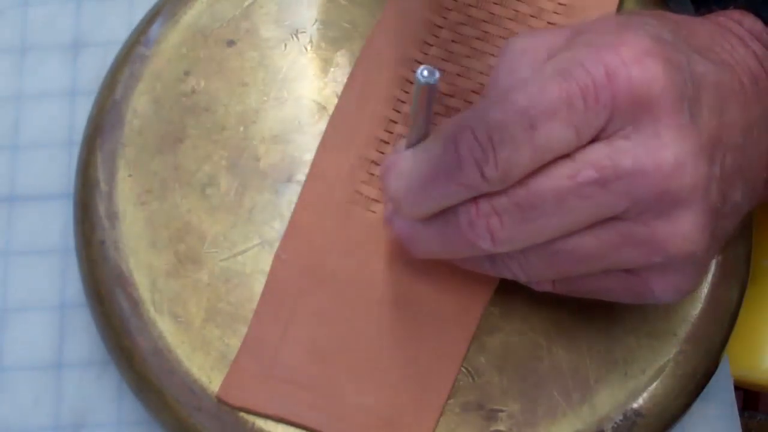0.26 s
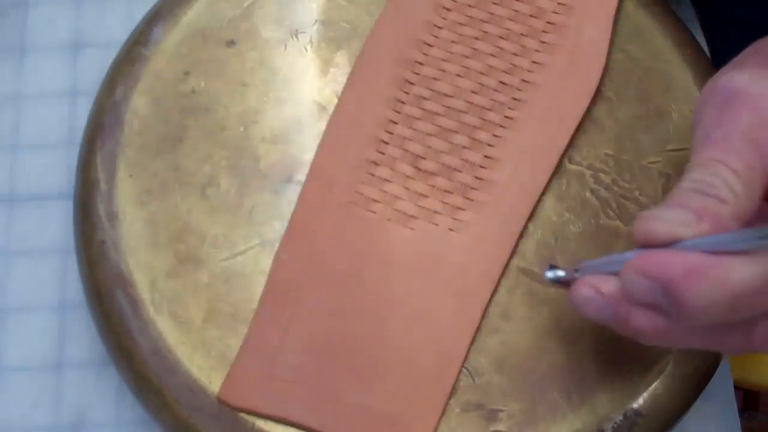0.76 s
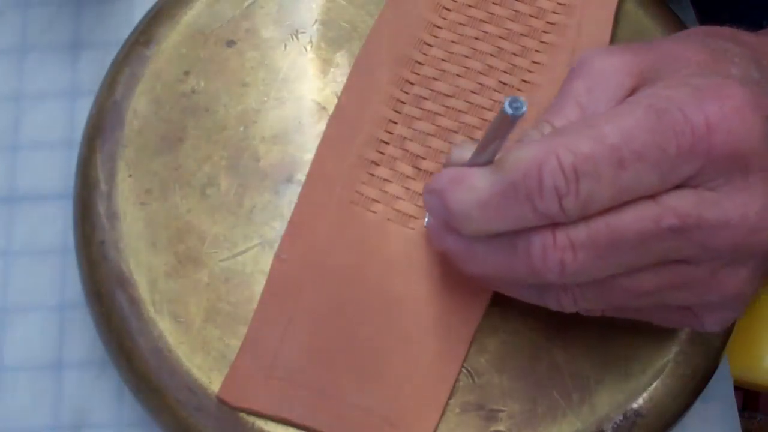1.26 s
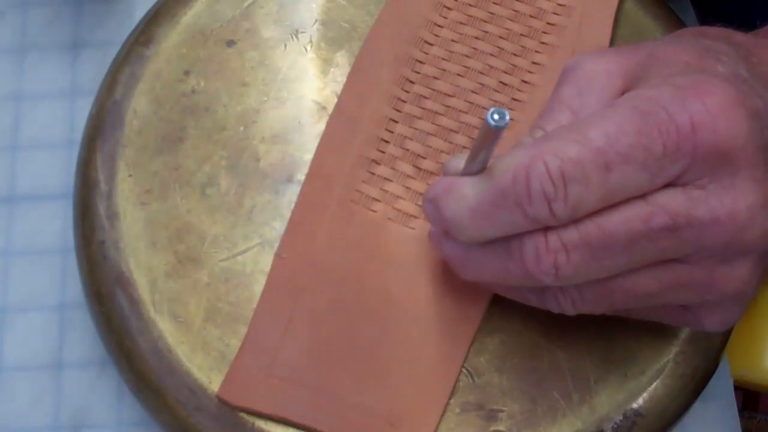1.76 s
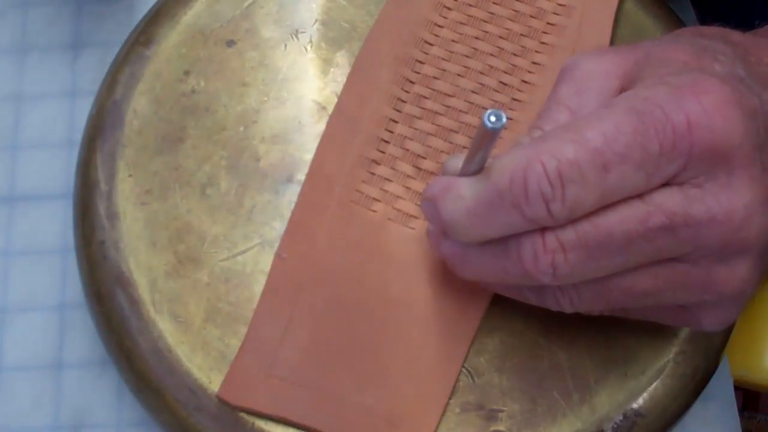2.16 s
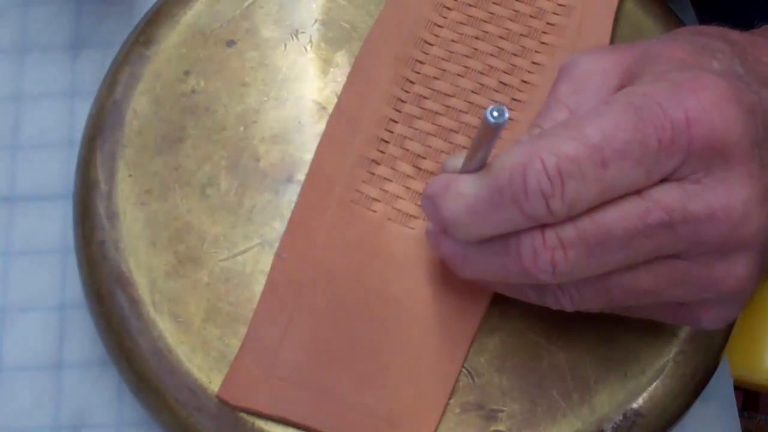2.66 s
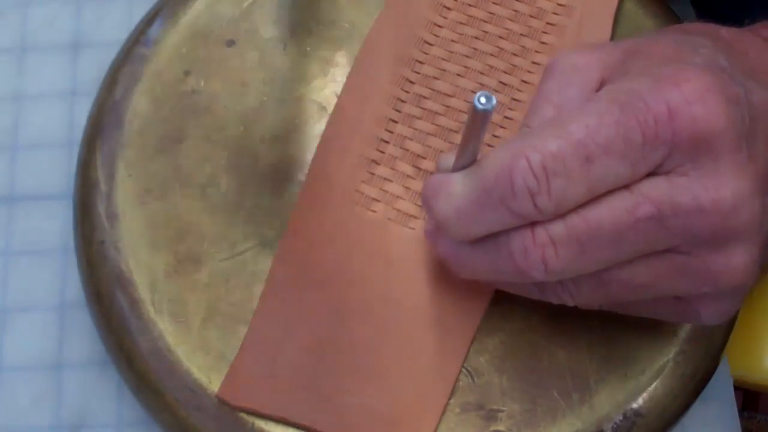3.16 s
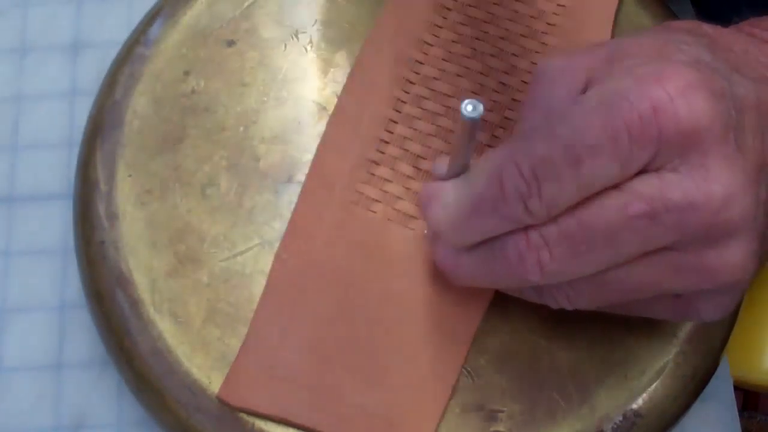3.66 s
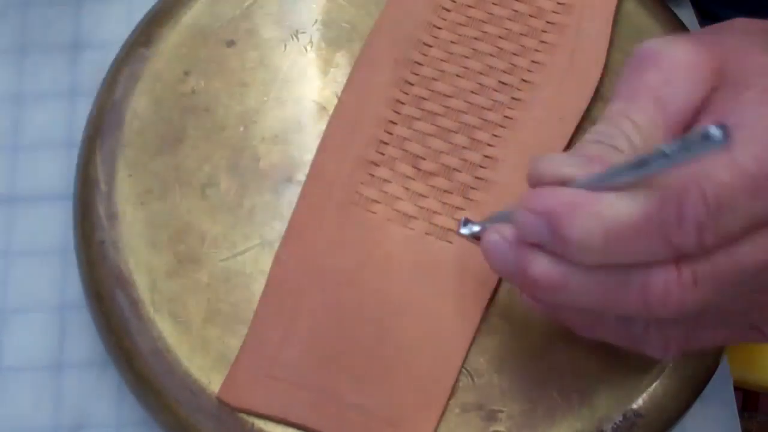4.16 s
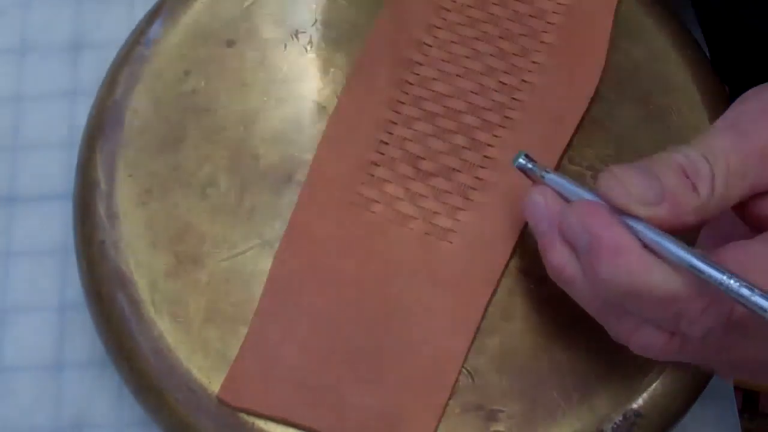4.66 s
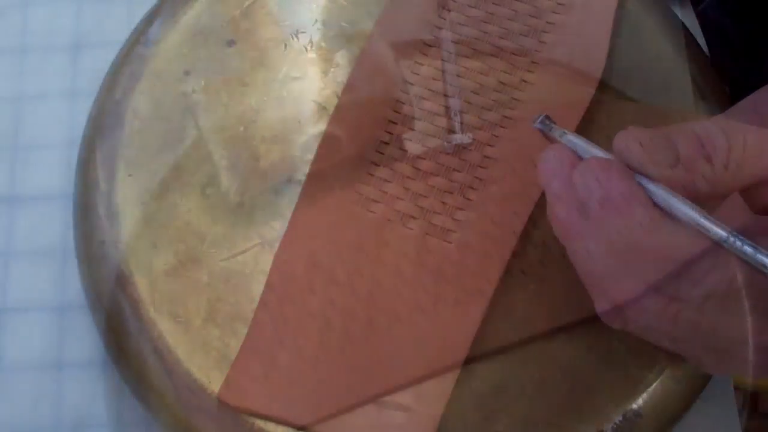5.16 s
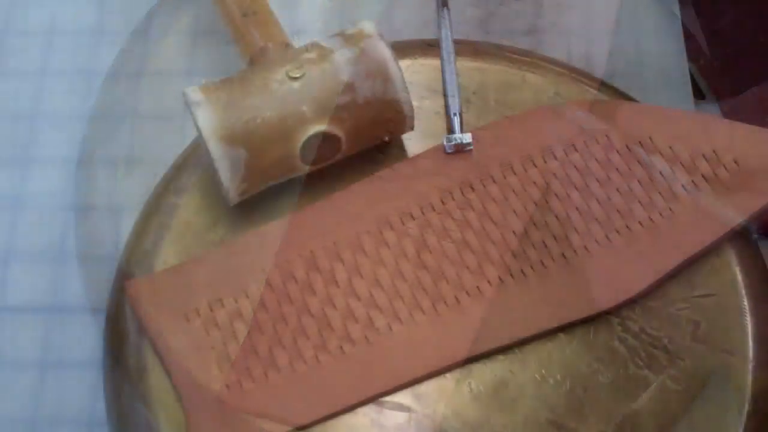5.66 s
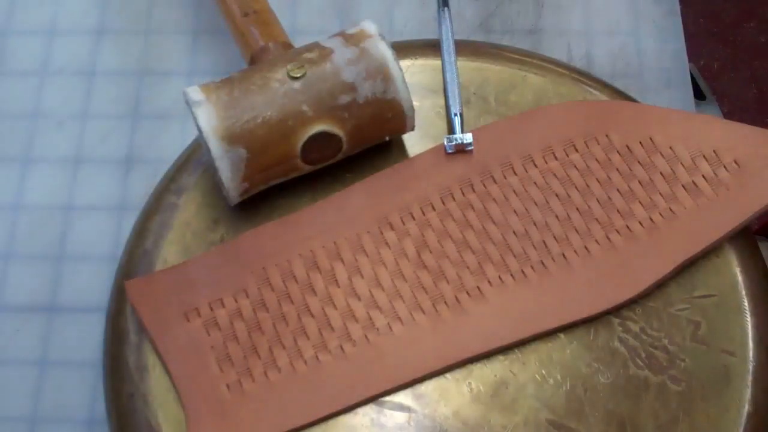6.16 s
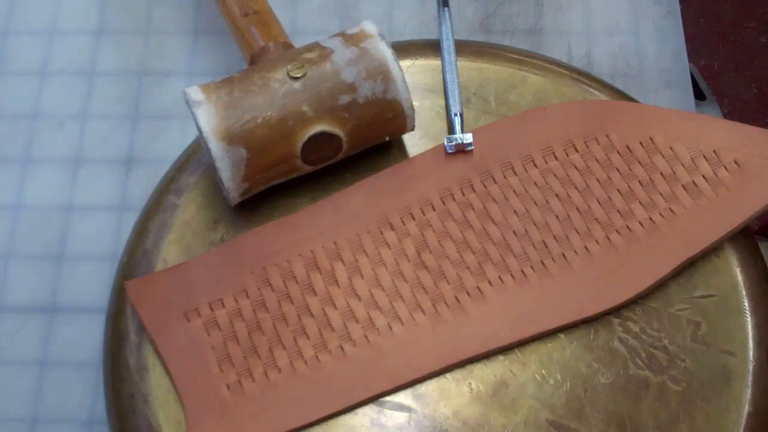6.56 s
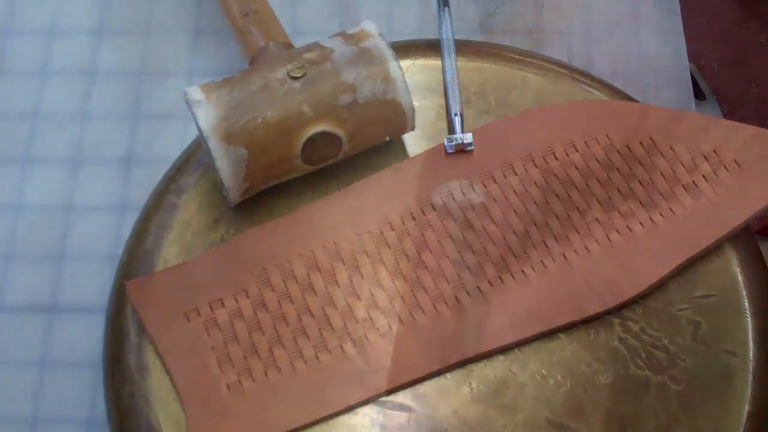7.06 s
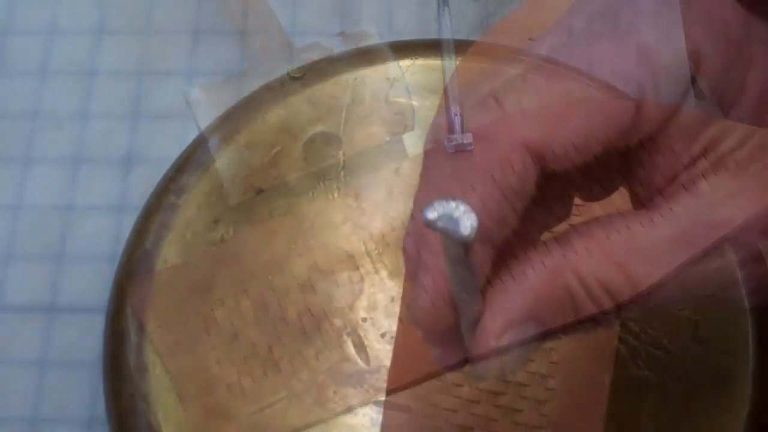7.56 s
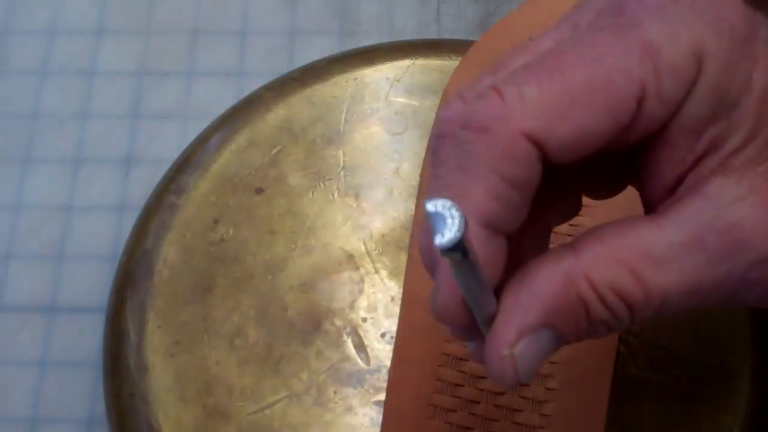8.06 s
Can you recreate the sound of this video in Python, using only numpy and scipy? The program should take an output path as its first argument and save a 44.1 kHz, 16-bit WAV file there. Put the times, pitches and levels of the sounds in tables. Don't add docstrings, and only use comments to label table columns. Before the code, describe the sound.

Close, overloaded metal-stamping whacks in two quick pairs, a clattering wooden set-down, then small rustles and ticks above a whining motor.

```python
import sys
import numpy as np
from scipy import signal
from scipy.io import wavfile
from scipy.ndimage import uniform_filter1d

SR = 44100
rng = np.random.default_rng(int(sys.argv[2]) if len(sys.argv) > 2 else 0)


def to_wav(s):
    ch = np.atleast_2d(s).T
    pcm = np.round(np.clip(ch, -1, 1) * 32767)
    wavfile.write(sys.argv[1], SR, pcm.astype(np.int16))


def decibels_to_gain(level_db):
    exponent = np.asarray(level_db, float) / 20
    return 10 ** exponent


N = 365588
EDGE_HZ = 14400
RECOVERY_DB_PER_S = 56.5

# start/s, length/s
DISSOLVES = [
    (5.007, 1.05),
    (6.961, 1.02),
]


def evened(x):
    return x / np.sqrt(np.mean(x ** 2) + 1e-20)


def read(points, hz):
    f, value = np.transpose(points)
    return np.interp(np.log(hz + 1), np.log(f + 1), value)


def add(mix, s, sound):
    part = mix[..., round(s * SR):][..., :sound.shape[-1]]
    part += sound[..., :part.shape[-1]]


def filtered(x, order, hz, kind):
    return signal.sosfilt(signal.butter(order, hz, kind, fs=SR, output="sos"), x)


def sideways(x, pan_db):
    return x * decibels_to_gain(np.array([[pan_db / 2], [-pan_db / 2]]))


def ring(modes, faster_db_per_s=0, rise_ms=0.12, size=SR // 2):
    t = np.arange(size) / SR
    hz, db, t60 = np.transpose(modes)[:, :, None]
    waves = decibels_to_gain(db - (60 / t60 + faster_db_per_s) * t) * np.sin(2 * np.pi * hz * t)
    return -waves.sum(0) * (1 - np.exp(-1000 * t / rise_ms))


def crack(decay_ms, low_hz=300, high_hz=18000):
    t = np.arange(600) / SR
    burst = rng.standard_normal(len(t)) * np.exp(-1000 * t / decay_ms)
    return filtered(burst, 1, [low_hz, high_hz], "band")


def noise(gain_db, same, patchy_db):
    frames, hz = N // 256 + 5, np.fft.rfftfreq(1024, 1 / SR)
    a, b, c, d, patches = rng.standard_normal((frames, 513, 5)).T
    patches = uniform_filter1d(patches, size=12, axis=0)
    patches = evened(uniform_filter1d(patches, size=14, axis=1))
    same = same(hz)[:, None]
    left, other = a + 1j * b, c + 1j * d
    z = np.array([left, same * left + np.sqrt(1 - same ** 2) * other])
    z *= decibels_to_gain(gain_db(hz)[:, None] + patchy_db * patches)
    z *= (hz < EDGE_HZ)[:, None]
    return evened(signal.istft(z, nperseg=1024, noverlap=768)[1][:, :N])


def wander(per_s):
    t = np.arange(0, N + 256, 256) / SR
    rates = np.geomspace(0.09 * per_s, per_s, 20)
    slow = sum(np.sin(2 * np.pi * (f * t + rng.random())) / np.sqrt(f) for f in rates)
    return np.interp(np.arange(N) / SR, t, evened(slow))


def stretches():
    t = np.arange(N) / SR
    first, second = (np.clip((t - s) / length, 0, 1) for s, length in DISSOLVES)
    return np.array([1 - first, first - second, second])


def motor(weight):
    # whine f/Hz, level/dB, drift/(dB per s), octave level/dB, air rush level/dB
    speeds = [
        (657.2, -47, -0.47, -59.5, -61),
        (665, -59.5, -9.5, -60, -61.5),
        (658, -52.5, -0.5, -56.5, -61.5),
    ]
    t = np.arange(N) / SR
    hz, whine_db, drift_db, octave_db, rush_db = np.transpose(speeds)[:, :, None]
    since = t - np.array([[0]] + [[s + length] for s, length in DISSOLVES])
    turn = 2 * np.pi * (hz * t + np.cumsum(0.31 * wander(per_s=6.5)) / SR)
    shape = np.sin(turn) + decibels_to_gain(-24) * np.sin(3 * turn)
    whine = (weight * decibels_to_gain(whine_db + drift_db * since) * shape).sum(0)
    whine = sideways(decibels_to_gain(0.46 * wander(per_s=5.1)) * whine, pan_db=-1.3)
    octave = np.array([(weight * decibels_to_gain(octave_db) * np.sin(2 * turn + step)).sum(0) for step in (.4, -.4)])
    octave = sideways(decibels_to_gain(1.7 * wander(per_s=28)) * octave, pan_db=5.5)
    return whine + octave, np.linalg.norm(weight * decibels_to_gain(rush_db + 8.5), axis=0)


def mains_hum(weight):
    mains = [(120, -66), (240, -58), (360, -62), (480, -67)]  # f/Hz, level/dB
    slip_turns = 0.43
    t = np.arange(N) / SR
    slip = weight[0] + weight[2] + weight[1] * np.exp(2j * np.pi * slip_turns)
    hum = sum(decibels_to_gain(db + 0.97 * wander(per_s=47)) * np.exp(2j * np.pi * (f * t + rng.random()))
              for f, db in mains)
    return decibels_to_gain(-0.5) * (slip * hum).imag


def air_rush(weight, strength):
    rush_colour = [(25, -35.5), (118, -12.5), (180, -26.5), (250, -11.5), (600, -15.5), (1350, -16),
                   (2200, -25), (5200, -52)]
    likeness = [(60, -0.12), (150, 1), (380, 0.88), (950, 1), (2380, 0.12), (5980, 0.73), (15000, 0.6)]  # f/Hz, left-right likeness [-1 to 1]
    rush = noise(lambda f: read(rush_colour, f), lambda f: read(likeness, f), patchy_db=1.1)
    rush = sideways(rush, pan_db=1.3)
    rush += weight[1] * decibels_to_gain(-1.5) * filtered(rush, 1, [301.76, 305.04], "band")
    return rush * strength


def distant_hiss(weight):
    hiss_colour = [(1470, -37), (2500, -6.5), (2970, -5), (3770, -8), (4200, -7), (8700, -10),
                   (14000, -7.5)]
    hiss_db = -60
    hiss = noise(lambda f: read(hiss_colour, f) - 30 * np.clip(1 - f / 1500, 0, 1),
                 lambda f: 0 * f, patchy_db=0.3)
    return sideways(decibels_to_gain(hiss_db + 3.5) * np.linalg.norm(weight, axis=0) * hiss, pan_db=1.5)


def machines():
    weight = stretches()
    whine, rush_strength = motor(weight)
    tones = np.sqrt(2) * (whine + mains_hum(weight))
    return tones + air_rush(weight, rush_strength) + distant_hiss(weight)


def bench(faster_db_per_s, tilt_db, count=5):
    bench_modes = [(80.5, -18, 0.55), (151, -3, 0.42), (168, -5, 0.3), (243, -3.5, 0.4), (348, -0.5, 0.294),
                   (386, -0.5, 0.21), (478, -1.5, 0.3), (584, 0.5, 0.19), (718, -11.5, 0.31),
                   (845, -5.5, 0.33), (995, -4, 0.32), (1130, -8, 0.3), (1260, -11, 0.25)]
    hz, db, t60 = np.repeat(bench_modes, count, axis=0).T
    hz = hz * (1 + .024 * rng.standard_normal(len(hz)))
    db = db - 7 + tilt_db * np.log2(np.maximum(hz, 200) / 400)
    modes = np.transpose([hz, db, t60])
    down = ring(modes[::2], faster_db_per_s, rise_ms=4, size=14000)
    up = ring(modes[1::2], faster_db_per_s, rise_ms=4, size=14000)
    return down - up


def blows():
    # t/s, thud level/dB, slap of the mallet face/dB, bell tone/dB, other plate modes/dB
    strikes = [
        (0.2704, 12.5, 8, -9.5, -21),
        (0.4896, 13.5, -7, -5, -22),
        (3.7465, 17.5, 12.5, -0.5, -11.5),
        (3.9748, 18.5, 5, 7, -7),
    ]
    # f/Hz, level/dB, t60/s
    thud_modes = [(720, 0.5, 0.0083), (1100, -5, 0.0069), (1454, -18, 0.0019)]
    slap_modes = [(1800, 5, .009), (2400, 1, 0.009), (3090, 0, .008)]
    # f/Hz, level/dB, t60/s
    plate_modes = [(2616, -9, .3), (2993, -2, .2), (3063, -8.5, 0.21), (3311, -9.5, 0.18), (4560, -30, 1.5),
                   (6040, -30, 0.8), (7101, -22, .35), (9222, -32, 1.2), (10524, -27, 0.6)]
    bell_modes = [(3704, 0, .17), (3695, -5, .15), (3644, -15, .25)]
    drone_modes = [(2202, 0, .66), (3704, -6, .55), (3680, -12, .45)]
    spread_db_per_s = 5000
    out = np.zeros((3, N))
    body, bright, heard = out
    for s, thud_db, slap_db, bell_db, plate_db in strikes:
        thud = decibels_to_gain(thud_db) * ring(thud_modes, size=2000)
        add(body, s, thud + decibels_to_gain(slap_db) * ring(slap_modes, size=2000))
        add(body, s, decibels_to_gain(thud_db - 25) * bench(RECOVERY_DB_PER_S, tilt_db=1.5))
        add(body, s, decibels_to_gain(thud_db + 2.5) * crack(decay_ms=3.1, high_hz=1800))
        add(bright, s, decibels_to_gain(thud_db - 6) * crack(decay_ms=0.81, high_hz=8900))
        bell = decibels_to_gain(bell_db) * ring(bell_modes, RECOVERY_DB_PER_S, rise_ms=1.72)
        plate = decibels_to_gain(plate_db) * ring(plate_modes, RECOVERY_DB_PER_S, rise_ms=0.95)
        add(bright, s, bell + plate)
        add(bright, s, decibels_to_gain(thud_db - 30.5) * ring(drone_modes, 42, rise_ms=17, size=30000))
        add(heard, s, decibels_to_gain(.5) * thud)
        add(heard, s, decibels_to_gain(slap_db - 1.5) * ring(slap_modes, spread_db_per_s, size=2000))
        add(heard, s, decibels_to_gain(-9.5) * bell)
        add(heard, s, decibels_to_gain(thud_db - 0.5 + 0.95 * slap_db) * np.ones(1))
    return out


def workshop(x):
    decay = [(60, 0.44), (160, 0.51), (420, 0.36), (1100, 0.3), (2900, 0.27), (7700, 0.4), (14000, 0.2)]  # f/Hz, t60/s
    colour = [(60, -16), (200, -0.5), (800, -3), (2000, 0), (5000, -0.5), (12000, -7), (14200, -2),
              (14600, -52.5)]
    left_brighter_db_per_khz = .25
    taps = np.zeros((2, SR // 2))
    at = np.arange(100, SR // 2 - 20, 20) + rng.integers(0, 20, (2, (SR // 2 - 101) // 20))
    np.put_along_axis(taps, at, rng.choice([-1., 1.], at.shape), 1)
    hz, t, z = signal.stft(taps, SR, nperseg=512)
    same = np.clip(1 - (hz[:, None] / 5000) ** 0.81, 0, 1)
    z[1] = same * z[0] + np.sqrt(1 - same ** 2) * z[1]
    z[1] *= decibels_to_gain(-left_brighter_db_per_khz * hz[:, None] / 1000)
    z *= decibels_to_gain(read(colour, hz)[:, None] - 60 * t / read(decay, hz)[:, None])
    tail = signal.istft(z, SR, nperseg=512)[1]
    return signal.fftconvolve(x[None], tail / np.linalg.norm(tail[0]), axes=1)[:, :N]


def rustles():
    # peak t/s, rise/s, fall/s, level/dB, low body relative level/dB
    movements = [(.754, 0.051, 0.022, -50, -4), (1.74, 0.032, 0.055, -46.5, -8),
                 (2.73, 0.023, 0.074, -48.5, -20), (3.131, .003, .03, -54, 4),
                 (3.738, .04, 0.0067, -48, -14), (4.288, 0.023, .025, -44, -5), (4.43, 0.14, 0.33, -37, -1),
                 (5.599, 0.063, 0.13, -43.5, -7), (5.76, 0.042, 0.25, -52, -1.5),
                 (5.914, 0.0091, 0.052, -55, -6), (6.33, .03, 0.072, -49.5, -4),
                 (6.488, 0.0031, 0.077, -48, 8), (6.789, 0.11, 0.24, -47, -2),
                 (7.57, 0.042, .05, -53.5, -14)]
    rustle_colour = [(70, -29.5), (300, 1), (1000, -4), (2500, -3), (4500, 4.5), (8000, 1), (12000, 4),
                     (15000, 6)]
    edge_db, roundness = 20, 1.26
    t, top, body = np.arange(N) / SR, np.zeros(N), np.zeros(N)
    for s, rise_s, fall_s, db, body_db in movements:
        away = np.where(t < s, (s - t) / rise_s, (t - s) / fall_s)
        on = away < 2
        stroke = decibels_to_gain(db - edge_db * away[on] ** roundness)
        top[on] += stroke
        body[on] += stroke * decibels_to_gain(body_db)
    slide = noise(lambda hz: read(rustle_colour, hz), lambda hz: .9 - hz / 14000, patchy_db=1.2)
    low = filtered(slide, 2, 2400, "low")
    grit = decibels_to_gain(1.4 * uniform_filter1d(rng.standard_normal(N), size=40) * np.sqrt(40))
    return sideways(grit * (top * evened(slide - low) + body * evened(low)), pan_db=3)


def bump():
    s, db, hz = (1.049, -31.5, 146)  # t/s, level/dB, f/Hz
    out = np.zeros((3, N))
    add(out[::2], s, -ring([(hz, db, 8 / hz)], rise_ms=4.9))
    return out


def ticks():
    # t/s, level/dB, f/Hz, length/ms, left-right/dB
    knocks = [(3.1032, -40, 5000, .5, 0), (3.109, -44, 4800, .8, 0), (3.1267, -23, 2300, 0.45, -0.5),
              (4.227, -30.5, 2292, 1.4, -2), (4.286, -31, 3100, 1.03, -0.5), (4.292, -36, 5030, 0.42, 4),
              (4.362, -33, 11550, 0.62, -3.5), (4.385, -40.5, 4500, .6, 1.5), (4.444, -42, 4500, .8, -3),
              (5.584, -29, 1800, 0.9, 7.5), (5.676, -24.5, 870, 1.3, -4), (5.685, -30.5, 940, 0.78, -7),
              (5.72, -36, 940, 3.5, -4), (5.777, -29.5, 970, 1.4, 0.5), (6.4875, -21, 1050, 1.3, 2),
              (6.797, -30, 720, 2, 3), (6.848, -25, 1050, 1.8, 8), (6.854, -20.5, 990, 1.7, -1.5),
              (6.9715, -32, 1300, .6, 3), (7.74, -28.5, 960, 1.9, -4.5)]
    click_below_db, click_db_per_octave, top_hz = 16.5, 7.5, 3984
    out = np.zeros((2, N))
    for s, db, hz, ms, pan_db in knocks:
        click_db = db - click_below_db + click_db_per_octave * np.log2(min(hz, top_hz) / 1024)
        modes = [(hz, db, ms * .008), (1.4 * hz, db - 5, ms * .004), (.45 * hz, db - 9, ms * .004)]
        tick = ring(modes, rise_ms=.2, size=600)
        click = decibels_to_gain(click_db + 6) * crack(decay_ms=.2, low_hz=800)
        add(out, s, sideways(tick + click, pan_db))
    return filtered(out, 2, 300, "high")


def mallet_laid_down():
    # t/s, knock level/dB, knock f/Hz, click level/dB, click f/Hz
    bounces = [
        (4.4590, 13, 276, -22.5, 955),
        (4.498, 20, 822, 6, 1910),
        (4.5628, 11, 560, -12.5, 3830),
        (4.5886, 12, 967, 7.5, 3160),
    ]
    # f/Hz, level below the click/dB, t60/s
    stamp_modes = [(3192, -38, .3), (3140, -37, .12), (5066, -38, .16), (5150, -37, .1)]
    bench_below_db, bench_db_per_octave = 14, -5
    damping_db_per_s = 118
    out = np.zeros((3, N))
    body, bright, heard = out
    for s, knock_db, hz, click_db, click_hz in bounces:
        bench_db = knock_db - bench_below_db + bench_db_per_octave * np.log2(hz / 256)
        knock = -ring([(hz, knock_db, 8 / hz)], rise_ms=900 / hz, size=3000)
        click_modes = [(click_hz, click_db, 14 / click_hz), (1.4 * click_hz, click_db - 9, .003)]
        add(body, s, knock)
        add(body, s, decibels_to_gain(bench_db) * bench(damping_db_per_s, tilt_db=-7.5))
        add(bright, s, ring(click_modes, size=3000))
        add(bright, s, decibels_to_gain(click_db - 12) * crack(decay_ms=1.2))
        add(heard, s, decibels_to_gain(4) * knock + ring([(click_hz, click_db + 2.5, 5 / click_hz)], size=3000))
        add(heard, s, decibels_to_gain(click_db + 3) * np.ones(1))
    add(bright, s, decibels_to_gain(click_db) * ring(stamp_modes, rise_ms=3))
    return out


def scene():
    body, bright, heard = blows() + bump() + mallet_laid_down()
    small = ticks()
    near = sideways(body, pan_db=1.5) + sideways(bright, pan_db=3.5)
    near[1] = np.roll(near[1], -1)
    room = decibels_to_gain(-9.5) * sideways(workshop(heard + decibels_to_gain(2) * small.mean(0)), pan_db=0.1)
    return near + room + small + rustles() + machines()


def low_pass(x):
    return signal.sosfilt(signal.butter(12, 15620, fs=SR, output="sos"), x)


def record(dry):
    dry = filtered(dry, 2, 45, "high")
    keep = np.exp(-1 / (0.0025 * SR))
    power = signal.lfilter([1 - keep], [1, -keep], (dry ** 2).mean(0))
    power_db = 10 * np.log10(power + 1e-12)
    climb = np.arange(N) * RECOVERY_DB_PER_S / SR
    held_db = np.maximum.accumulate(power_db + climb) - climb
    over_db = np.maximum(held_db + 19.5, 0)
    lag = np.exp(-1 / (0.0031 * SR))
    ducked = dry / decibels_to_gain(signal.lfilter([1 - lag], [1, -lag], 0.57 * over_db))
    clipped = np.clip(ducked, -.95, .95)
    edge = signal.firwin(255, EDGE_HZ, window=("kaiser", 5), fs=SR)
    edged = signal.oaconvolve(clipped, edge[None], "same")
    leak = decibels_to_gain(-17) * (clipped - edged)
    return low_pass(edged + leak)


dry = scene()
out = record(dry)
to_wav(out)
```